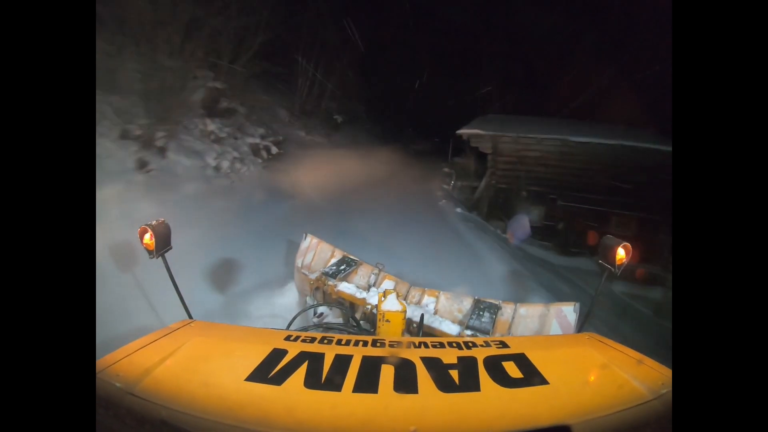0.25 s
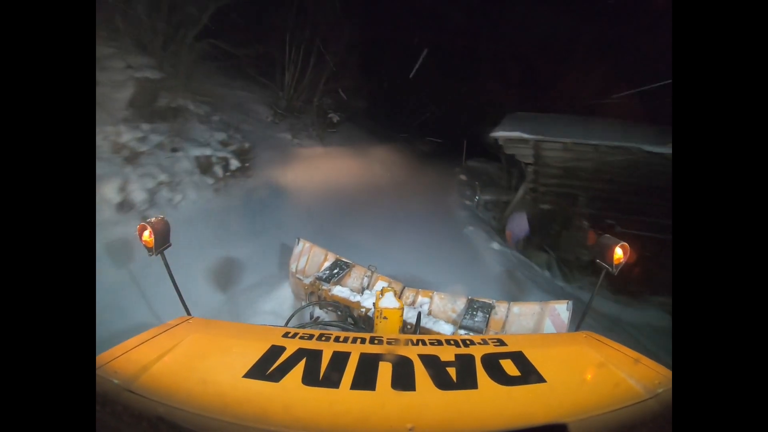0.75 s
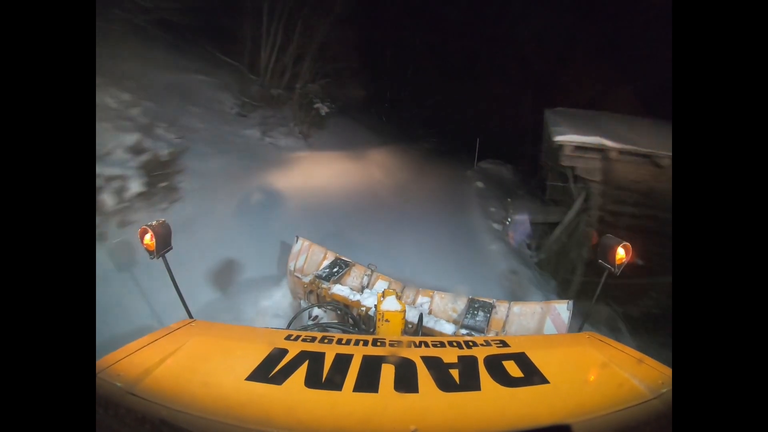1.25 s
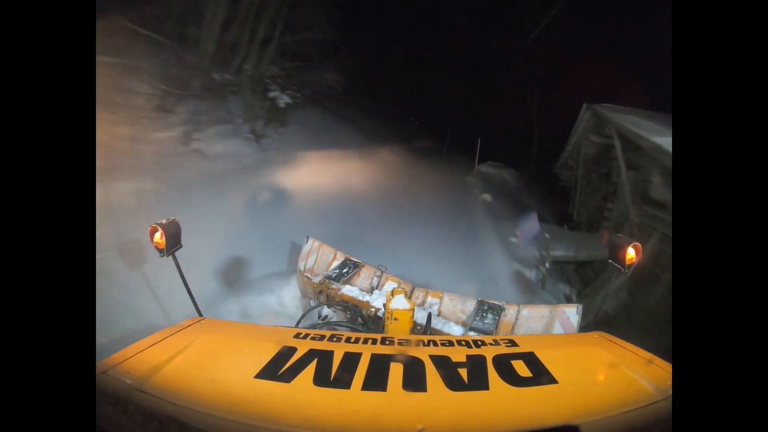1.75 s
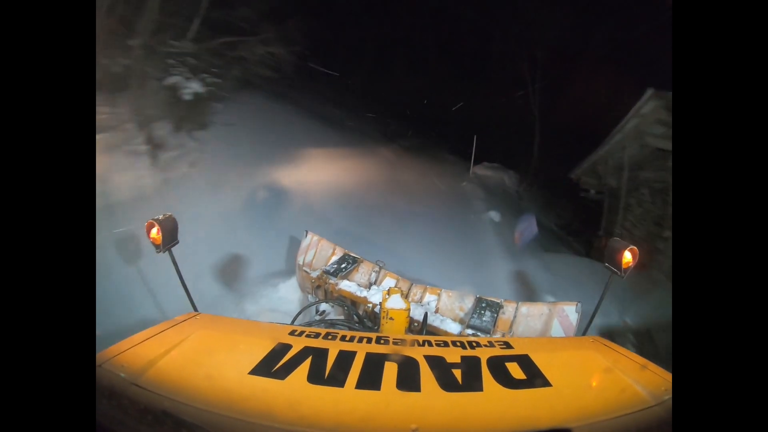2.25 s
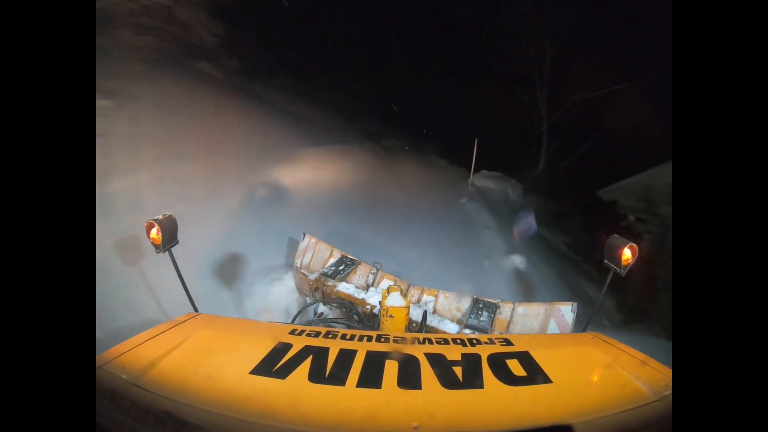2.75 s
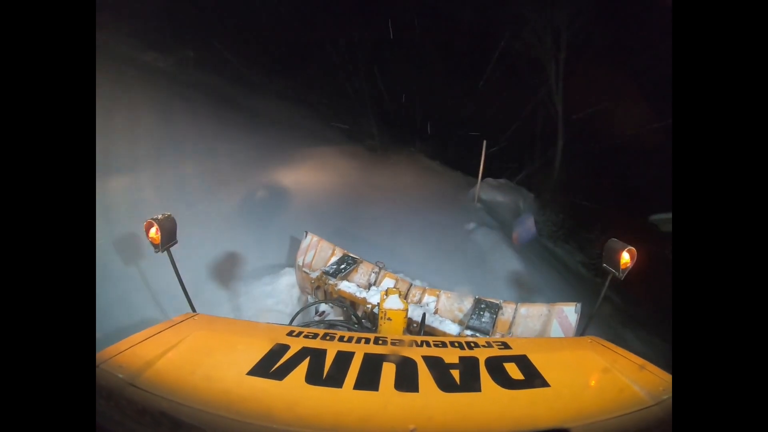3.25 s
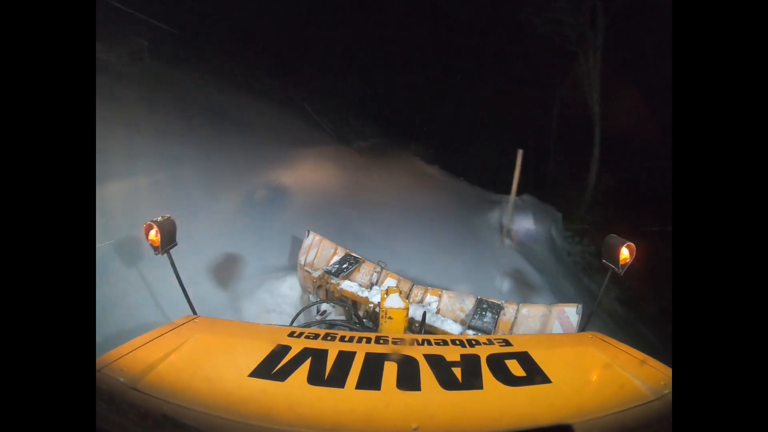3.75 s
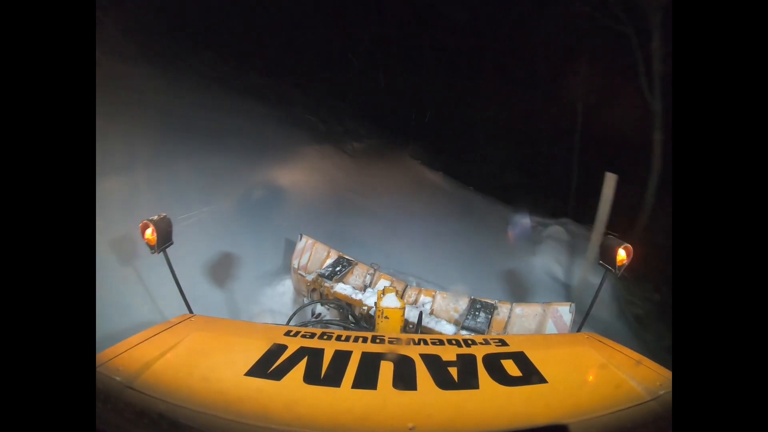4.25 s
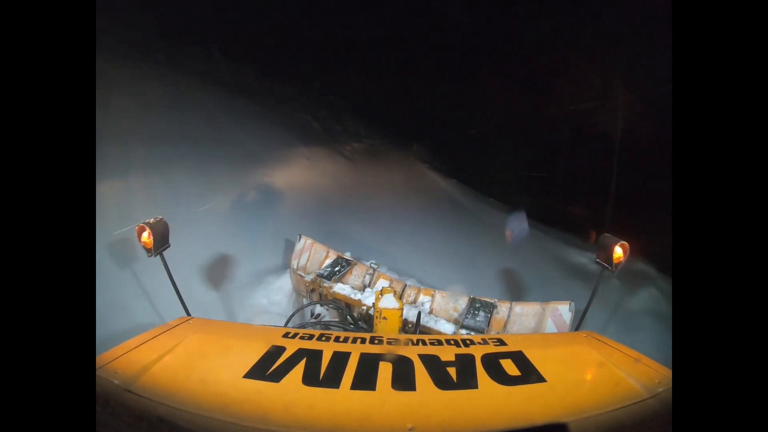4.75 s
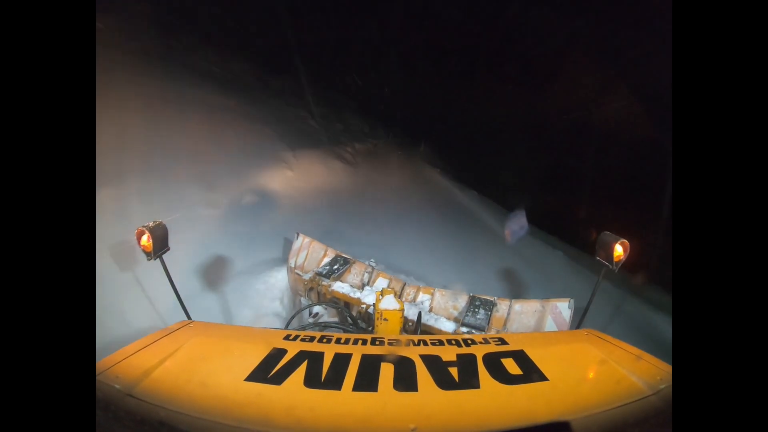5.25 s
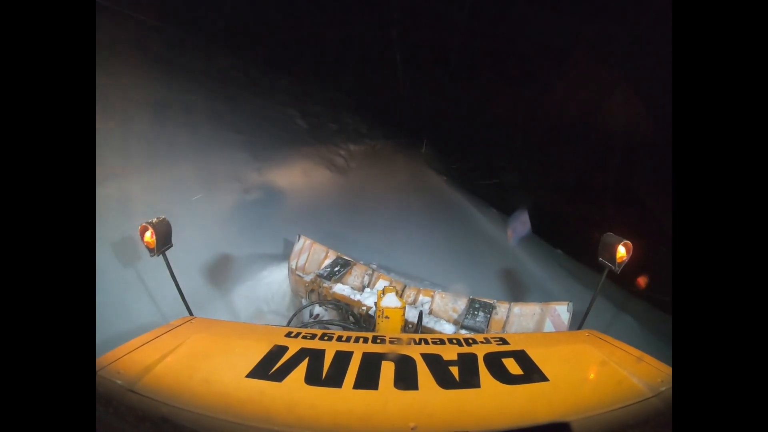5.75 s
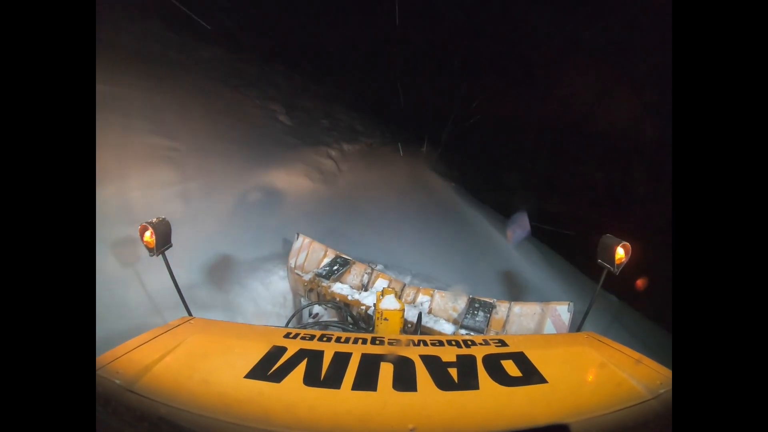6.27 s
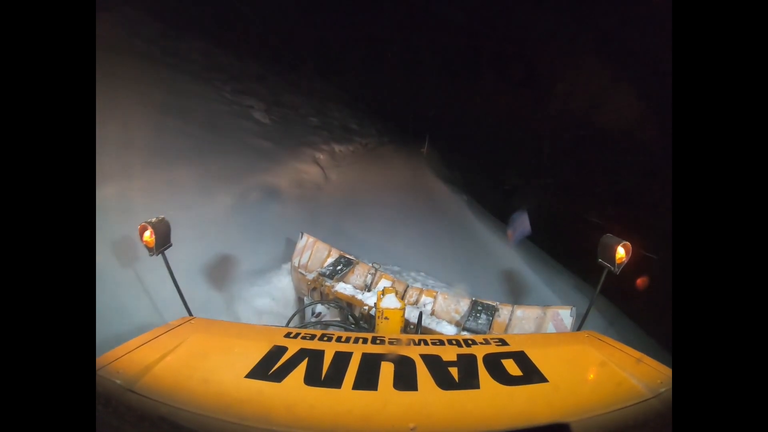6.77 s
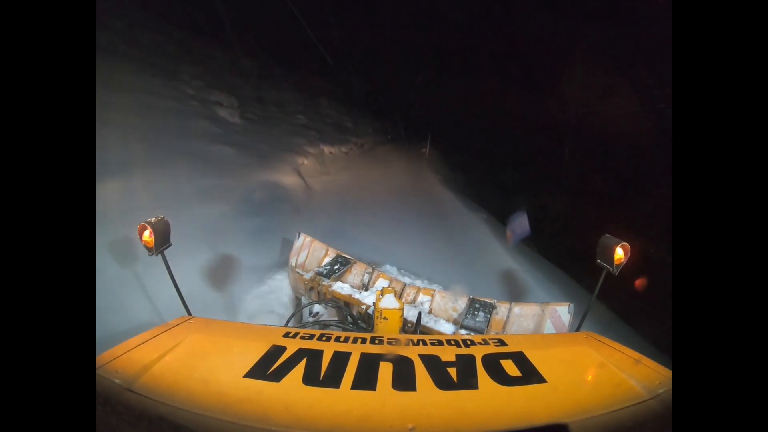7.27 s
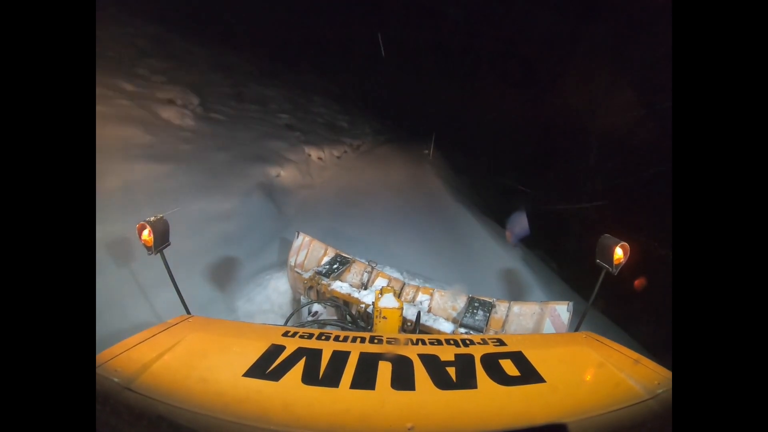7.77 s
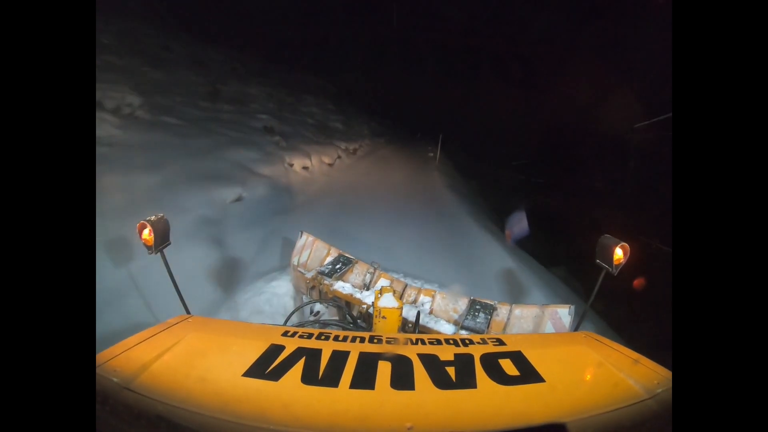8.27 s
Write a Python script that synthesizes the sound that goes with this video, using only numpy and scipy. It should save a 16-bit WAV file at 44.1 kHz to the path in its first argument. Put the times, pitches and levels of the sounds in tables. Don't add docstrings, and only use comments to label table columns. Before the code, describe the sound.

Inside a plough truck cab, a diesel engine booms low and steady while the blade scrapes along a snowy road with dull knocks and rushing snow.

```python
import sys
import numpy as np
from scipy import signal
from scipy.fft import rfft, irfft, next_fast_len
from scipy.io import wavfile
from scipy.ndimage import uniform_filter1d

SR = 44100
rng = np.random.default_rng(int(sys.argv[2]) if len(sys.argv) > 2 else 0)


def inscribe(sig):
    pcm = np.round(np.clip(np.atleast_2d(sig).T, -1, 1) * 32767)
    wavfile.write(sys.argv[1], SR, pcm.astype(np.int16))


def volts_from_db(level):
    exponent = np.asarray(level, float) / 20
    return 10 ** exponent


N = 375291
TIME = np.arange(N) / SR
SIZE = next_fast_len(N)
FREQ = np.maximum(np.arange(SIZE // 2 + 1) * SR / SIZE, 1.)

# time in seconds, firings per second in Hz.
ENGINE_SPEED = [(0, 66.8), (.25, 65.6), (.5, 66.1), (1.05, 63.9), (2.1, 64.2), (2.75, 65.3), (3.5, 65.6),
                (3.8, 64), (4.5, 62.1), (5.0, 62.8), (5.25, 61.2), (5.75, 60), (6.0, 57.6), (6.75, 57.8),
                (7.25, 59.1), (7.75, 60.4), (8.25, 62.1), (8.51, 62.5)]
# time in seconds, scrape level in dB.
BLADE_BITE = [(0, -34), (.34, -35.5), (.55, -33), (1.5, -32.5), (3.5, -32), (4.25, -33), (4.75, -36),
              (5.4, -36), (6.2, -38.5), (6.7, -37), (7.7, -37.5), (8.1, -35), (8.51, -35)]
# multiple of one sixth of the firing rate, level in dB.
UNEVEN_CYLINDERS = [(3, -38), (9, -37), (10, -28), (13, -33), (17, -35), (19, -37), (24, -40), (33, -42),
                    (34, -43)]
# centre in Hz, width in Hz, tone level at the peak in dB.
CAB_AIR = [(56.37, 9.7, -14.5), (124.9, 12.4, -20.5), (187.5, 8.9, -22.5)]

# frequency in Hz, level per Hz in dB.
SHAKE_COLOUR = [(6, -30), (11, -16), (18, -2), (24, -11), (36, 0), (48, -8), (62, -13), (75, -14),
                (90, -30)]
BOOM_COLOUR = [(55, -31), (76, -9), (87, -4.5), (96, -3.5), (108, -0.5), (135, -3), (158, -8), (182, -0.5),
               (212, -8.5), (250, -6), (295, -12.5), (340, -31)]
DRONE_COLOUR = [(260, -27), (305, 0.5), (340, -1), (400, 1.5), (480, -3.5), (520, -6.5), (600, -31.5)]
SCRAPE_COLOUR = [(440, -21), (530, 1), (700, -1.5), (860, -3.5), (930, -9.5), (1150, -29.5)]
CLATTER_COLOUR = [(750, -26.5), (950, -1.5), (1300, -4), (1600, -4), (1900, -4), (2200, -10), (2500, -10.5),
                  (2700, -15), (2920, -15), (3000, -22), (3600, -37.5)]
RUSH_COLOUR = [(2500, -20.5), (3150, 1), (4150, -2), (4800, -7), (6100, -11), (6850, -10.5), (7300, -18),
               (7900, -13), (8600, -20.5), (10400, -20.5), (11500, -29.5), (13600, -35), (14500, -44),
               (16000, -62)]

# centre in Hz, width in Hz, rise over the surroundings in dB.
BOOM_PANELS = [(140, 10, 3), (181, 12, 5), (250, 18, 3), (285, 14, 3)]
DRONE_PANELS = [(335, 16, 5), (395, 24, 2), (478, 22, 3)]
BLADE_PANELS = [(550, 25, 2), (603, 14, 7), (648, 16, 3), (711, 16, 8), (780, 22, 3), (860, 40, 4)]
CAB_PANELS = [(1032, 20, 6), (1205, 12, 7), (1335, 25, 2), (1428, 40, 8.5), (1503, 14, 4), (1710, 60, 3),
              (2285, 50, 4), (2405, 28, 8), (2455, 26, 7), (2634, 45, 9), (2775, 25, 3)]

# time
# in seconds, then change in dB of frame jolt, blade drone and cab boom.
BRIEF_SWELLS = [(.02, 0, 3.5, 2), (.25, 4.5, 0.5, -1), (.68, -1, 3, 1.5), (1.02, 2, 2, 0.5),
                (1.42, -1.5, 3.5, -0.5), (1.6, 4, -0.5, 1), (2.02, 5.5, 1.5, 1), (2.38, 0, 2, -1),
                (2.84, 6.5, 1.5, 0), (3.2, 2.5, -0.5, -1), (3.57, -1.5, 3.5, 0), (4.05, 3, 2, 1.5),
                (4.42, -3, 2, -1.5), (4.9, 5, 0.5, 0.5), (5.4, -3, 0.5, -1.5), (5.85, 5, 0, 1),
                (6.1, 1, 1, 1.5), (6.35, 1, 0, 2), (6.8, -0.5, 1, 2.5), (7.2, 4, -1, 2), (7.65, 0, 1, -0.5),
                (8.0, -3, 0.5, -1), (8.4, 1, 0, 0)]
# start in seconds, level in dB, ring in Hz, width in Hz,
# time to fade by 60 dB in seconds.
EDGE_KNOCKS = [
    (0.384, -29, 690, 120, 0.13),
    (.427, -19, 516, 260, .35),
    (1.0, -26.5, 692, 47, 0.25),
    (2.691, -16.5, 175, 55, 0.18),
    (3.335, -23, 260, 54, .25),
    (5.781, -20.5, 252, 100, 0.17),
    (6.0, -11.5, 240, 61, .3),
    (6.12, -30.5, 332.5, 11, 1.19),
    (6.5, -29.5, 335, 11, 1.3),
    (7.11, -9, 176, 70, 0.15),
]
# time in seconds, swell in dB, length in seconds.
SNOW_CLODS = [(.49, 2.5, 0.037), (.71, 2.5, .04), (2.25, 1, .08), (2.42, 0, .16), (3.06, 1, .03),
              (3.17, 1, .03), (.8, -0.5, .15), (3.58, 4, 0.054), (4.4, 3, .03), (5.38, 3.5, 0.036),
              (5.93, 2.5, .08), (6.468, 2.5, 0.058), (7.2, 5, 0.028)]
# start in seconds, level in dB, centre in Hz, width in Hz, length in seconds.
LINKAGE_SQUEAKS = [
    (2.04, -71, 10250, 400, .045),
    (2.05, -70, 9200, 500, .06),
    (5.9, -68, 9300, 600, .13),
    (5.93, -75, 10200, 500, .1),
]


def curves(table):
    s, *columns = np.transpose(table)
    return [np.interp(TIME, s, column) for column in columns]


def unit(x):
    return x / np.sqrt(np.mean(x ** 2))


def walk(rate):
    k = int(SR / rate)
    steps = np.repeat(rng.standard_normal(N // k + 1), k)
    return unit(uniform_filter1d(uniform_filter1d(steps, k), k)[:N])


def even(x, span_s):
    k = int(span_s * SR)
    return x / np.sqrt(uniform_filter1d(uniform_filter1d(x ** 2, k), k))


def band(x, hz, width_hz):
    edges = [max(hz - width_hz / 2, 20.), hz + width_hz / 2]
    return signal.sosfilt(signal.butter(3, edges, "bandpass", fs=SR, output="sos"), x)


def ring(drive, colour, panels, flicker_db, rate):
    hz, db = np.transpose(colour)
    gain = volts_from_db(np.interp(np.log(FREQ), np.log(hz), db, left=-200, right=-200))
    for centre, width, peak_db in panels:
        gain = gain * (1 + (volts_from_db(peak_db) - 1) / (1 + (2 * (FREQ - centre) / width) ** 2))
    spectrum = rfft(drive, SIZE) * gain
    thirds = 3 * np.log2(FREQ / hz[0])
    out, shared = 0, walk(rate)
    for k in range(int(3 * np.log2(hz[-1] / hz[0])) + 2):
        own = walk(rate)
        share = np.clip(1 - abs(thirds - k), 0, 1)
        out = out + volts_from_db(flicker_db * (own + shared) / 2) * irfft(spectrum * share, SIZE)[:N]
        shared = own
    return unit(out)


def squeaks():
    out = np.zeros(N)
    for s, db, hz, width_hz, length in LINKAGE_SQUEAKS:
        swell = np.hanning(int(length * SR))
        hiss = unit(band(rng.standard_normal(SR // 2), hz, width_hz)[-len(swell):])
        out[int(s * SR):][:len(swell)] += volts_from_db(db) * swell * hiss
    return out


def clods():
    return sum(db * np.exp(-(2 * (TIME - s) / length) ** 2) for s, db, length in SNOW_CLODS)


def knocks():
    out = np.zeros(N)
    for s, db, hz, width_hz, t60 in EDGE_KNOCKS:
        t = np.arange(int(t60 * SR)) / SR
        fade = (1 - np.exp(-t / 0.0041)) * np.exp(-np.log(1000) * t / t60)
        rough = unit(band(rng.standard_normal(2 * SR), hz, width_hz)[-len(t):])
        out[int(s * SR):][:len(t)] += volts_from_db(db) * fade * rough
    return out


def brief_swells():
    swell_s = 0.22
    s, *columns = np.transpose(BRIEF_SWELLS)
    swell = np.exp(-(2 * (TIME[::100, None] - s) / swell_s) ** 2)
    return [np.repeat(swell @ db, 100)[:N] for db in columns]


def plough(cycle, shake_db, boom_db, drone_db, scrape_db, rush_db):
    buzz = 1 + .12 * np.cos(6 * cycle)
    grit = volts_from_db(1.3 * np.minimum(rng.exponential(size=N), 7))
    shake = even(ring(rng.standard_normal(N), SHAKE_COLOUR, [], flicker_db=.5, rate=4), span_s=.12)
    boom = even(ring(rng.standard_normal(N), BOOM_COLOUR, BOOM_PANELS, flicker_db=.5, rate=8), span_s=.12)
    drone = ring(rng.standard_normal(N), DRONE_COLOUR, DRONE_PANELS, flicker_db=0.93, rate=12)
    scrape = ring(buzz * rng.standard_normal(N), SCRAPE_COLOUR, BLADE_PANELS, flicker_db=0.2, rate=10)
    spray = np.sqrt(buzz) * grit * volts_from_db(0.23 * walk(10)) * rng.standard_normal(N)
    rush = ring(spray, RUSH_COLOUR, [], flicker_db=0.84, rate=25)
    low = volts_from_db(shake_db + 2.5) * shake + volts_from_db(boom_db + 0.67) * boom
    return low + volts_from_db(drone_db) * drone + volts_from_db(scrape_db) * scrape + volts_from_db(rush_db) * rush


def block(cycle, clatter_db):
    beat = 1 + .14 * np.cos(6 * cycle) + .05 * np.cos(3 * cycle)
    clatter = ring(beat * rng.standard_normal(N), CLATTER_COLOUR, CAB_PANELS, flicker_db=0.17, rate=22)
    return volts_from_db(clatter_db) * clatter


def exhaust(cycle, hz, tone_db):
    pipe_lag = .45
    null_hz, null_width_hz, null_db = 95, 6, -11
    tones = 0
    for k, db in enumerate(tone_db):
        level = volts_from_db(db + 0.45 * k * walk(7))
        lag = k * (pipe_lag + .3 * walk(.8) + .15 * walk(6))
        tones = tones + level * np.cos(6 * (k + 1) * cycle + lag)
    lumps = 0
    for k, db in UNEVEN_CYLINDERS:
        dip_db = null_db * np.exp(-((k * hz / 6 - null_hz) / null_width_hz) ** 2)
        heard_db = db + dip_db + 3.1 * walk(2.47)
        lumps = lumps + volts_from_db(heard_db) * np.cos(k * cycle + 1.22 * walk(3))
    return np.sqrt(2) * volts_from_db(1.0) * (tones + lumps)


def scene():
    (hz,), (scrape_db,) = curves(ENGINE_SPEED), curves(BLADE_BITE)
    tone_db = []
    for k, (centre, width, db) in enumerate(CAB_AIR):
        tone_db.append(db - 10 * np.log10(1 + (2 * ((k + 1) * hz - centre) / width) ** 2))

    bite_db = scrape_db + 32.5
    shake_db = -25 + .8 * bite_db
    boom_db = -19.5 + 0.69 * bite_db
    drone_db = -28.5 + .5 * bite_db
    clatter_db = -37 + 0.61 * bite_db
    rush_db = -54.5 + .5 * bite_db
    jolt_db, surge_db, swell_db = brief_swells()

    cycle = 2 * np.pi * (np.cumsum(hz) / SR + .2072) / 6
    blade = plough(cycle, shake_db + jolt_db, boom_db + swell_db, drone_db + surge_db,
                   scrape_db, rush_db + clods())
    engine = block(cycle, clatter_db) + exhaust(cycle, hz, tone_db)
    return (squeaks() + knocks() + blade + engine)[None]


def top_cut(x):
    return signal.sosfilt(signal.butter(12, 15100, fs=SR, output="sos"), x)


def record(dry):
    slow = signal.butter(4, 320, fs=SR, output="sos")
    bass = signal.sosfiltfilt(slow, dry)
    rounding = signal.sosfiltfilt(slow, np.tanh(1.8 * bass) / 1.8 - bass)
    edges = np.clip(np.minimum(TIME + .002, TIME[-1] - TIME + .0006) / .004, 0, 1)
    return top_cut((dry + rounding) * edges + .0005)


dry = scene()
out = record(dry)
inscribe(out)
```